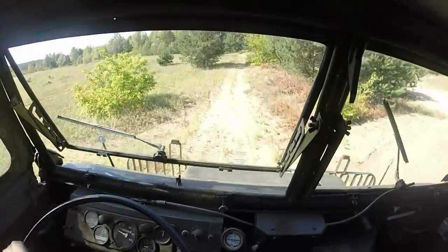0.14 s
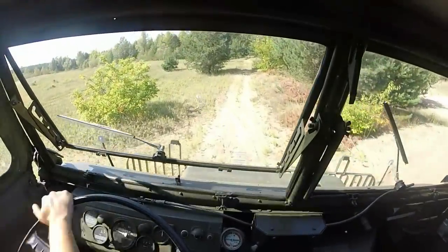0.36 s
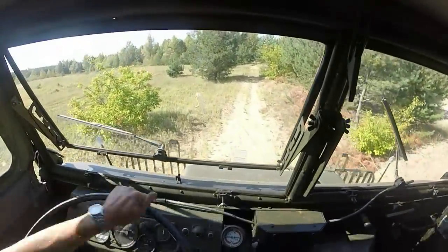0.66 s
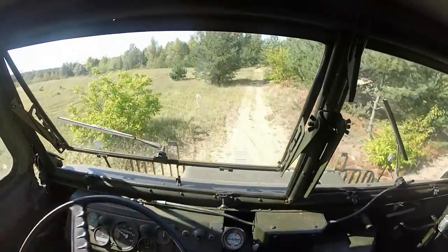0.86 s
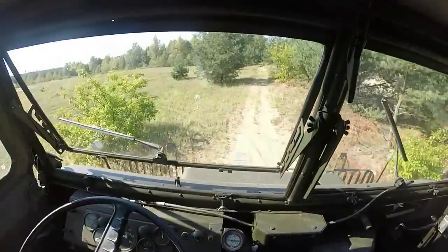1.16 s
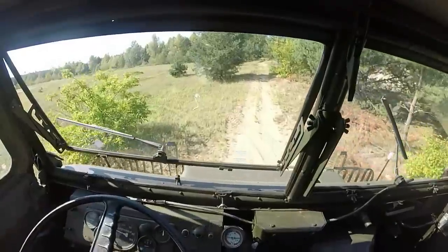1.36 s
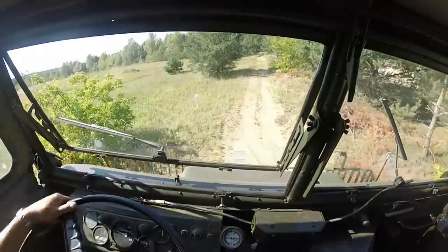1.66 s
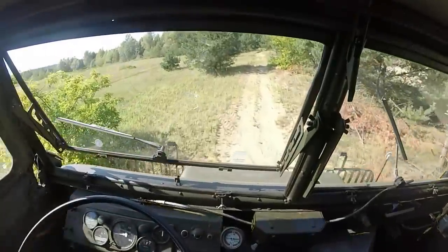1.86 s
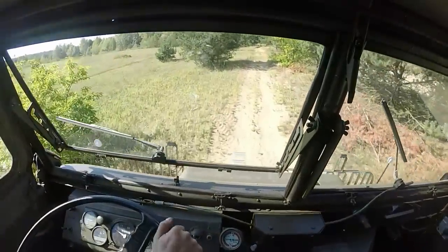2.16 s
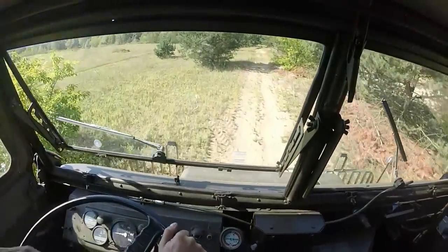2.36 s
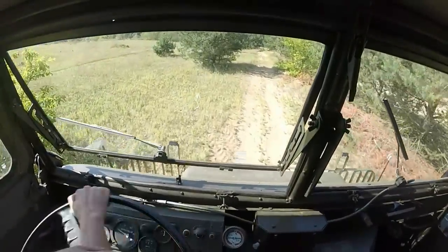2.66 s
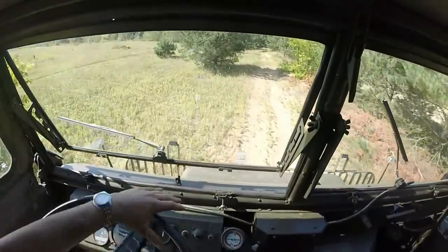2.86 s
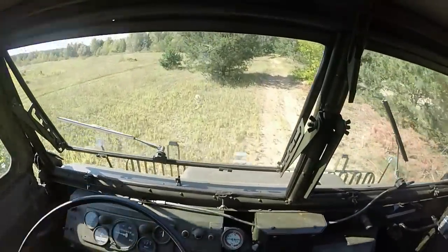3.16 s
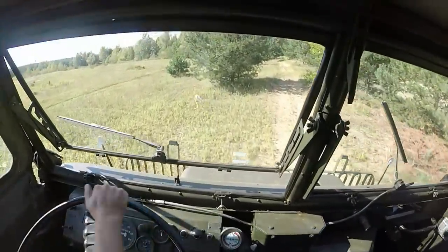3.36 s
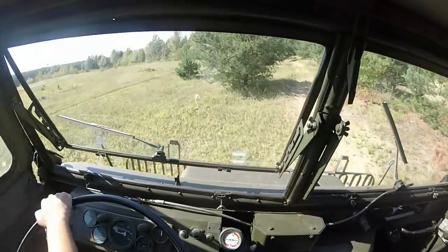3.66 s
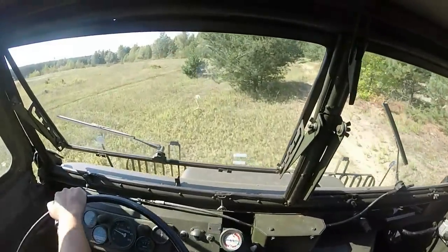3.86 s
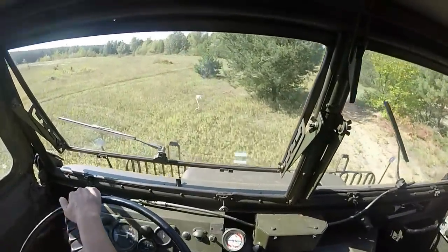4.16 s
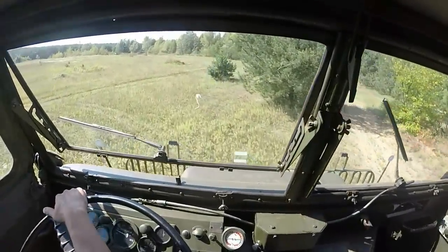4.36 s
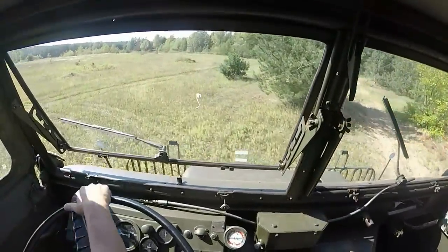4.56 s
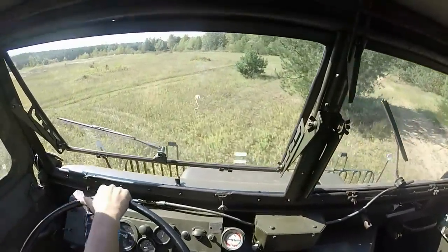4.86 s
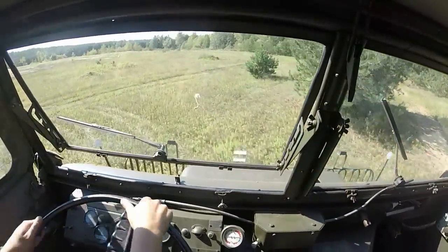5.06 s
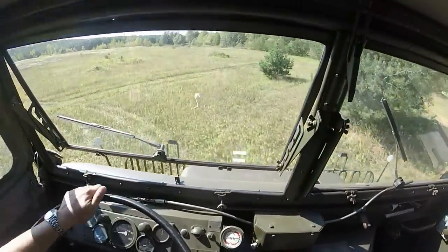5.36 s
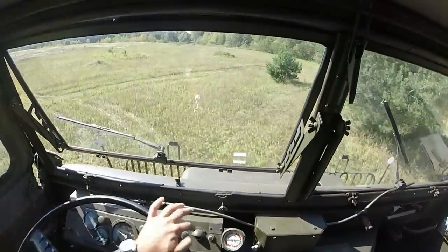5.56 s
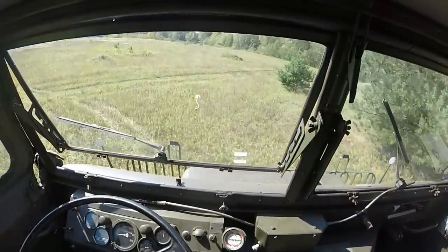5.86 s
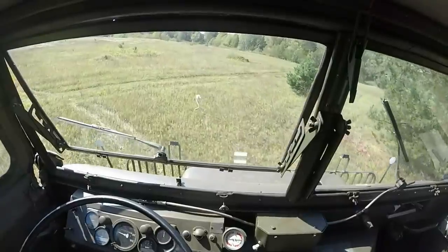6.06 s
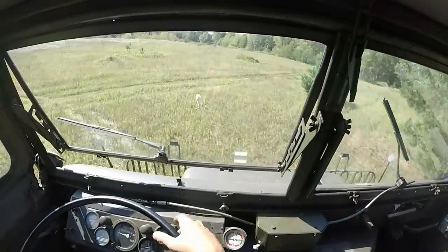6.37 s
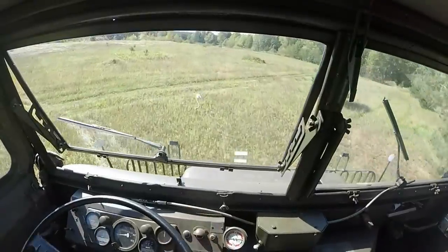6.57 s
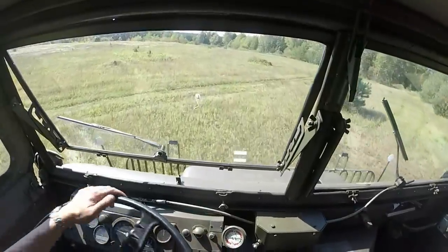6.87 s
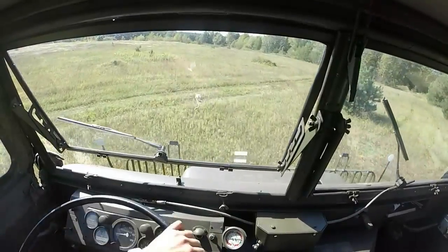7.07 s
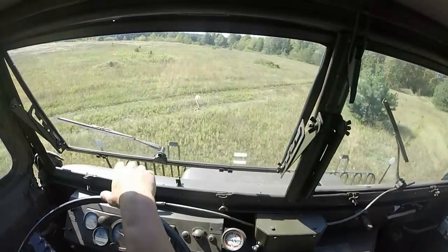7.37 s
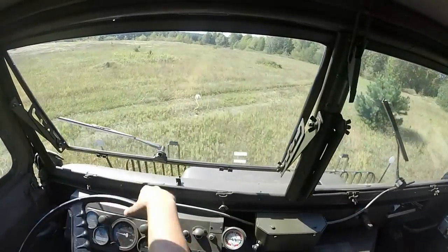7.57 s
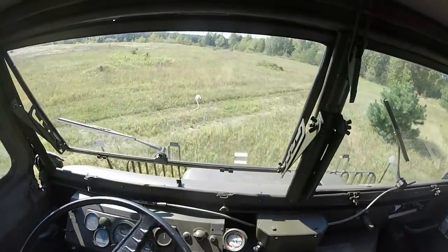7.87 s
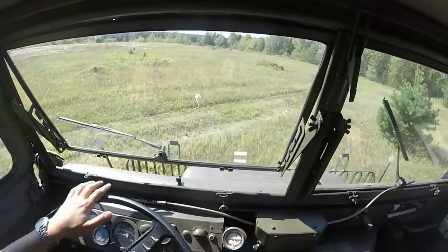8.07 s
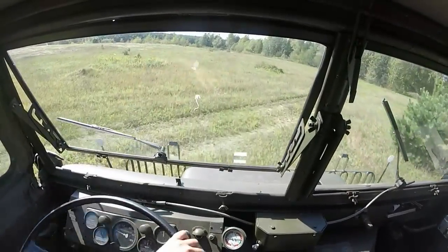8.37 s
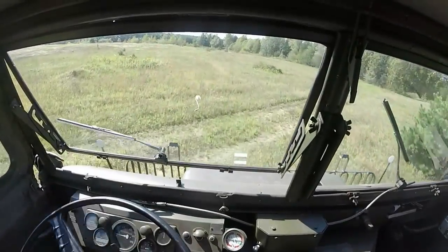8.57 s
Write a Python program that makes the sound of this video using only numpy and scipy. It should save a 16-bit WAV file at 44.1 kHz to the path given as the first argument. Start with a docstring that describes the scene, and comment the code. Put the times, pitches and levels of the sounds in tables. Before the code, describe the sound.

Heavy truck interior on rough ground: deep wavering engine hum, muffled roar, frequent dull thuds, clattering knocks, light taps and a few dry scrapes.

```python
"""Old truck cab on rough ground

Inside a steel cab, heard by a small camera in a hard case. A slow six-beat engine hums as a stack of
wavering tones, and its noisy roar is coloured by the cab panels and the case. Bumps ring the camera mount
near 155 Hz, loose fittings knock and tap, a small metal part tinks, and something dry scrapes.
The background drops suddenly at set times, as after loud jolts, and then creeps back up."""
import sys
import numpy as np
from scipy import signal
from scipy.fft import rfft, irfft
from scipy.io import wavfile
from scipy.ndimage import uniform_filter1d

SR = 44100
rng = np.random.default_rng(int(sys.argv[2]) if len(sys.argv) > 2 else 0)


def dump_mix(stems):
    """Bounce the given channels to the path in sys.argv[1] as a 16-bit WAV at rate SR."""
    frames = np.atleast_2d(stems).T  # one column per channel
    limited = np.clip(frames, -1, 1)  # hard clip at full scale
    pcm = np.round(limited * 32767).astype(np.int16)
    wavfile.write(sys.argv[1], SR, pcm)


def how_loud(loudness_db):
    """Turn decibels into a plain amplitude multiplier (0 dB gives 1, 20 dB gives 10)."""
    steps = np.asarray(loudness_db, float) / 20
    return 10 ** steps


N = 384552
T = np.arange(N) / SR  # time of every sample, s

# how fast the background creeps back after a drop, and how long the drop is smoothed over
# drops of the background: t/s, level just after the drop compared with full/dB
CREEP_DB_PER_S, SINK_S = 12, 0.018
DROPS = [(0, -5.5), (.66, -7), (.845, -10), (1.04, -15), (2.115, -8.5), (2.23, -10), (2.44, -10.5),
         (2.8, -9.5), (2.94, -12.5), (3.39, -10), (3.57, -11.5), (3.77, -12.5), (4.25, -13.5), (4.52, -14),
         (4.575, -18.5), (5.355, -13), (5.43, -14), (5.63, -15.5), (6.9, -4.5), (8.27, -2)]

# engine over time: t/s, cycle rate f/Hz, hum level over road rumble/dB,
# level of both together before heaving and drops/dB
ENGINE_SPEED = [(0, 15.6, -1, -13), (.45, 16.1, 0, -16), (.8, 16.6, 0.5, -12.5), (1.5, 13.8, 9, -18),
                (2.4, 14.2, 3, -12), (3.1, 15.4, 8.5, -11), (3.6, 15.1, -6, -11), (4.2, 15.3, 6.5, -10.5),
                (4.7, 14.7, 2, -14), (5.2, 14, 3, -8), (5.9, 13.1, 6, -15), (6.3, 13.3, 3, -14),
                (6.8, 14.4, 5, -12), (7.2, 15.2, 7, -17), (7.7, 16.8, 8.5, -15.5), (8.2, 15.3, 3, -15),
                (8.72, 15.8, 14, -12)]
# engine hum tones: multiple of the cycle rate, level/dB
ENGINE_TONES = [(1, 7), (2, -2), (3, -11.5), (4, -7.5), (5, -2.5), (6, -2), (7, -20), (9, -7), (12, -10),
                (15, -23.5)]
# cab body resonances shaken by the road: f/Hz, width/Hz, level/dB
CAB_BODY = [(16.6, 2.5, -3), (30.8, 2.9, -7.5), (55.87, 5.1, -0.5), (86.2, 8.6, -8), (121, 28, -19.5)]
SWAY_DB, SWAY_PER_S = 1.6, 6  # rumble and mount hum heave with the ruts: spread, new levels a second

# broad colour of the roar before its resonances: f/Hz, level per Hz/dB
ROAR_COLOUR = [(120, -23), (220, -5.5), (390, -14), (530, -34), (700, -21.5), (1200, -25), (1530, -28),
               (1850, -28.5), (2150, -32), (3300, -29.5), (3900, -35), (6300, -39), (9500, -51.5),
               (13000, -61.5), (15500, -82)]
# cab panels that drone with the engine: f/Hz, width/Hz, lift of the roar/dB
CAB_PANELS = [(219.5, 14, 5.5), (324, 22, 8.5), (340, 7.7, 3), (446, 20, 14.5), (483, 18, 6.5)]
# case resonances in four groups from low to high: f/Hz, time to fade by 60 dB t/s,
# level when knocked/dB, lift of the roar/dB
CASE_GROUPS = [
    [(320, 0.062, 6.5, -1.5), (440.5, 0.08, -2, 6.5), (612, 0.051, 0, 11.5), (812, 0.041, -3, -5.5)],
    [(1025, 0.035, 0.5, 3), (1229, 0.029, 9, 6), (1404, 0.041, -4.5, 2.5)],
    [(1730, 0.03, -0.5, 5), (1872, 0.042, 5.5, 5), (1948, 0.079, -10.5, 8.5)],
    [(2375, 0.065, -8, 13.5), (2659, 0.041, 5.5, 8), (2752, 0.015, 6, 2), (3440, 0.031, -14.5, 9),
     (4220, 0.04, -21, 0.5), (4770, 0.023, -16.5, -5), (4870, 0.039, -18, 3.5), (5750, .02, -18.5, 4),
     (7800, 0.0097, -36, 4)],
]
ROAR_FULL_DB = -55  # level of the roar from 6.5 to 10 kHz, at full background
RATTLE_PER_S, RATTLE_DB = 90, -7.5  # loose grit: average ticks a second, gain before mixing with the hiss

# random light taps: usual rate, rise of that rate after a knock (8 = nine times), fading time of the rise
TAPS_PER_S, TAPS_AFTER, TAPS_AFTER_S = 14, 8.0, 0.06
TAPS_SPREAD_DB, TAP_S = 4, 0.005  # size spread, fading time of one push
# taps in each of the four case groups, at full background: level/dB
TAP_LEVELS = [-43, -48, -47, -53]

# resonances of the small metal part: f/Hz, time to fade by 60 dB t/s, level/dB
METAL_PART = [(8620, .1, 0), (11500, .08, -17), (5700, .03, -4)]
# tinks of that part: t/s, peak level/dB
TINK_HITS = [(1.6742, -56), (4.3344, -54), (4.8564, -64), (5.123, -69), (5.7823, -66), (5.87, -64),
             (5.9402, -66)]
# bright scrapes, like a hand or sleeve against something dry: t/s, peak level/dB
SCRAPE_HITS = [(0.437, -38.5), (1.115, -39), (2.946, -52), (3.3784, -47), (3.7828, -43.5), (4.0702, -47),
               (5.3677, -50)]

# knocks on the case: t/s, then peak level/dB of the first, second, third and fourth case group
KNOCK_HITS = [(.2592, -30, -35, -39, -42), (.2958, -31, -32, -36, -41), (.4356, -32, -36, -41, -32),
              (.4811, -27.5, -31, -33, -32), (.529, -17, -20, -20, -19), (.582, -29, -22, -27, -35),
              (.6216, -26, -27, -34, -44), (.6559, -25, -16, -16, -20), (.6886, -27, -29, -22, -18),
              (.781, -13, -20, -24, -30), (.841, -21, -23, -16, -16), (.943, -29, -31, -33, -32),
              (.9876, -24, -28, -25, -30), (1.0065, -29, -29, -19, -32), (1.017, -22, -35, -31, -34),
              (1.0386, -25, -29, -26, -31), (1.239, -30, -43, -51, -51), (1.276, -31, -42, -44, -58),
              (1.298, -38, -39, -40, -42), (1.372, -27, -34, -37.5, -34), (1.449, -32, -36, -39, -41),
              (1.535, -25, -33, -38, -40), (1.683, -37, -45, -36, -44), (1.995, -32, -34.5, -44, -44),
              (2.075, -32, -29, -33, -47), (2.1084, -18, -22, -15, -18), (2.2295, -23, -34, -29, -37),
              (2.4315, -25, -17, -19, -33), (2.447, -27, -32, -38, -40), (2.551, -38, -33, -28, -44),
              (2.567, -34, -38, -37, -45), (2.66, -31.5, -37, -44, -35), (2.709, -47, -35, -42, -49),
              (2.7605, -28, -34, -35, -43), (2.839, -36, -38, -39, -38), (2.904, -49, -52, -35, -52),
              (2.935, -19, -36, -41, -44), (2.944, -28, -38, -36, -36), (3.0265, -20, -29, -35, -43),
              (3.141, -31, -38, -57, -52), (3.354, -33, -37, -31, -36), (3.3635, -29, -31, -40, -40),
              (3.38, -14, -31, -34, -31), (3.391, -25, -33, -28, -39), (3.559, -16, -19, -37, -28),
              (3.584, -16, -22, -21, -27), (3.629, -21, -32, -42, -38), (3.709, -36, -41, -33, -55),
              (3.747, -16, -18, -22, -28), (3.762, -18, -26, -28, -34), (3.783, -20, -25.5, -26, -30),
              (3.8615, -28, -45, -45, -39), (3.971, -35, -39, -36, -48), (4.035, -39, -42, -37, -58),
              (4.067, -28, -44, -38, -37), (4.13, -22, -23, -18, -19), (4.176, -28, -38, -38, -40),
              (4.218, -32, -28, -32, -36), (4.2406, -16, -20, -14, -16), (4.37, -45, -38, -36, -44),
              (4.47, -28, -33, -29, -38), (4.493, -32, -32, -26, -39), (4.52, -22, -25, -23, -33),
              (4.535, -30, -28, -27, -28), (4.566, -20, -26, -29, -29), (4.605, -34, -39, -37, -37),
              (4.703, -22, -29, -29, -31), (4.989, -30, -43, -40, -40), (5.033, -30, -34, -50, -40),
              (5.329, -18, -22, -26, -33), (5.349, -23, -21, -26, -29), (5.399, -36, -39, -33, -30),
              (5.426, -25, -41, -31, -35), (5.579, -25, -37, -37, -32), (5.621, -26, -37, -40, -42),
              (5.648, -22, -43, -40, -46), (5.672, -22, -31, -43, -42), (5.806, -38, -42, -39, -38),
              (5.922, -33, -41, -33, -49), (6.274, -42, -44, -33, -43), (6.285, -36, -37, -38, -34),
              (6.338, -38, -44, -33, -40), (6.378, -26, -27, -37, -31), (6.661, -33, -31, -30, -39),
              (6.68, -34, -39, -31, -46), (6.719, -20, -28, -25, -35), (6.861, -28, -41, -31, -39),
              (6.9815, -26, -51, -40, -37), (7.024, -23, -42, -36, -28), (7.1, -31, -34, -32, -37),
              (7.139, -29, -31, -30, -53), (7.283, -30, -46, -29, -53), (7.305, -27, -38, -36, -50),
              (7.503, -30, -35, -37, -53), (7.521, -27, -42, -33, -40), (7.587, -26, -29, -33, -32),
              (7.712, -25, -28, -28, -31), (7.987, -40, -50, -28, -45), (8.205, -27, -41, -36, -47),
              (8.371, -35, -41, -33, -39), (8.52, -24, -46, -37, -39), (8.5824, -24, -23, -17, -17)]
CONTACT_S = 0.0032  # length of the first contact
CHATTER_T60_S, CHATTER_S_PER_DB = 0.06, 0.002  # fade time at -20 dB; fainter knocks chatter on longer

# camera mount resonances: f/Hz, time to fade by 60 dB t/s, level/dB
MOUNT_MODES = [(138, 0.13, -7), (154.8, 0.21, 2), (189, 0.061, -9.5), (220.4, 0.13, -19),
               (318.3, 0.07, -18), (320, 0.054, -40), (406.7, 0.36, -32.5)]
# bumps that ring the mount: t/s, peak level/dB, pitch f/Hz
BUMP_HITS = [(0.073, -12, 151), (0.371, -13.5, 153.6), (0.538, -12.5, 145), (0.597, -15, 151),
             (0.696, -10, 152), (0.775, -9.5, 158.6), (0.926, -14, 147), (0.992, -9, 164),
             (1.025, -8.5, 162.4), (1.074, -6.5, 155.6), (1.14, -15, 158), (1.73, -16, 155),
             (1.79, -17, 160), (1.93, -17, 170), (2.071, -11.5, 145.4), (2.127, -8.5, 150),
             (2.19, -14, 163), (2.212, -10, 163), (2.245, -9, 163), (2.275, -13, 163), (2.433, -7.5, 164.6),
             (2.656, -16, 159.3), (2.794, -5.5, 165), (2.937, -6.5, 155.7), (3.384, -7.5, 146.3),
             (3.566, -16, 140), (3.752, -11, 163), (3.789, -9.5, 152.7), (3.969, -14.5, 148.9),
             (4.25, -9.5, 153.5), (4.504, -7.5, 162), (4.571, -7.5, 148.4), (4.708, -8.5, 160.7),
             (5.352, -5, 156.1), (5.43, -14, 155), (5.58, -6.5, 163), (5.625, -6, 157.6), (5.68, -12, 161),
             (6.406, -14, 155), (6.593, -14, 155.7), (6.658, -15, 156.3), (6.744, -12.5, 164),
             (6.788, -11.5, 155), (6.84, -13, 155), (6.891, -8, 156.4), (7.066, -16, 152.8),
             (7.157, -14.5, 154), (7.314, -7.5, 155), (7.396, -15, 152.5), (7.658, -14.5, 148.4),
             (7.751, -16.5, 137.2), (7.829, -10, 158), (8.018, -15, 146.4), (8.264, -8.5, 151),
             (8.338, -16, 147.7), (8.427, -8, 147.7), (8.516, -12.5, 151), (8.587, -14, 145),
             (8.639, -11, 158)]
BUMP_T60_S, PUSH_S = 0.115, 0.0065  # fade of the bump's main tone by 60 dB, fading time of the push
SHAKE_FULL_DB, SHAKE_FOLLOWS = -20, 0.33  # mount hum at full background, its share of each drop in dB


def unit(x):
    """Scale a sound to an average (rms) level of 1."""
    return x / np.sqrt(np.mean(x ** 2))


def walk(rate):
    """Wander at random: pick `rate` levels a second, smooth them twice, give them a spread of 1."""
    hold = int(SR / rate)
    steps = np.repeat(rng.standard_normal(N // hold + 1), hold)
    smooth = uniform_filter1d(uniform_filter1d(steps, hold), hold)
    return unit(smooth[:N])


def ring(hz, t60, db, seconds=0.25):
    """Let a set of resonances ring freely after one tap, each fading at its own speed."""
    t = np.arange(int(seconds * SR))[:, None] / SR
    fade = np.exp(-np.log(1000) * t / t60)
    return np.sum(how_loud(db) * np.sin(2 * np.pi * hz * t) * fade, axis=1)


def add(out, s, x, peak_db):
    """Mix a hit in at time s; its loudest 6 ms get the given average (rms) level."""
    i = int(s * SR)
    loudest = np.sqrt(uniform_filter1d(x ** 2, size=280).max())
    out[i:i + len(x)] += (x * how_loud(peak_db) / loudest)[:len(out) - i]


def coloured(x, gain):
    """Filter a sound by a gain that depends on frequency."""
    f = np.maximum(np.arange(N // 2 + 1) * SR / N, 1)
    return irfft(rfft(x) * gain(f), N)


def peak(f, hz, width):
    """Strength of one resonance around its centre, where it is 1."""
    return 1 / np.sqrt(1 + ((f - hz * hz / f) / width) ** 2)


def sink():
    """Background level in dB: it drops at once, then climbs at a steady pace until full."""
    s, db = np.transpose(DROPS)
    last = np.maximum(np.searchsorted(s, T, side="right") - 1, 0)
    climbing = db[last] + CREEP_DB_PER_S * (T - s[last])
    return uniform_filter1d(np.minimum(climbing, 0), int(SINK_S * SR))


def body_gain(f):
    """The cab body's resonances, added together as powers."""
    return np.sqrt(sum((how_loud(db) * peak(f, hz, width) ** 2) ** 2 for hz, width, db in CAB_BODY))


def rumble(cycles, hum_db):
    """Engine tones that waver with uneven firing, over the road shaking the cab body."""
    hum = 0
    for multiple, db in ENGINE_TONES:
        level = how_loud(db + 2.0 * walk(4))
        hum = hum + level * np.sin(2 * np.pi * (multiple * cycles + 0.042 * walk(2.6)))
    road = coloured(rng.standard_normal(N), body_gain)
    return (how_loud(hum_db) * unit(hum) + unit(road)) / np.sqrt(1 + how_loud(hum_db) ** 2)


def case_gain(f):
    """The roar's broad colour, lifted at each resonance of the cab panels and of the case."""
    hz_points, db_points = np.transpose(ROAR_COLOUR)
    broad = how_loud(np.interp(np.log(f), np.log(hz_points), db_points))
    lift = 0
    for group in CASE_GROUPS:
        for hz, t60, _, db in group:
            lift = lift + (how_loud(db) - 1) * peak(f, hz, 5.2 / t60) ** 2  # quick fading means a wide peak
    for hz, width, db in CAB_PANELS:
        lift = lift + (how_loud(db) - 1) * peak(f, hz, width) ** 2
    return broad * np.maximum(1 + lift, 0.1)


def roar(cycles):
    """Engine noise puffed by each of six firings a cycle, with loose grit ticking in it."""
    puff = 1 + 0.081 * np.cos(2 * np.pi * 6 * cycles)
    hiss = rng.standard_normal(N) * puff * how_loud(1.0 * walk(12))
    sizes = how_loud(np.minimum(5.1 * rng.exponential(size=N), 14))
    grit = (rng.random(N) < RATTLE_PER_S / SR) * sizes
    grit = np.convolve(grit, np.exp(-np.arange(600) / 126.0))[:N]
    # grit is duller than the hiss
    ticks = coloured(rng.standard_normal(N) * grit, lambda f: 1 / np.sqrt(1 + (f / 3300) ** 4))
    x = coloured(hiss + how_loud(RATTLE_DB) * ticks, case_gain)
    treble = coloured(x, lambda f: (f > 6500) & (f < 10000))
    return x / np.std(treble)


def taps():
    """Loose fittings push the case lightly at random, more often just after a knock."""
    stirred = sum((T > row[0]) * np.exp(-np.abs(T - row[0]) / TAPS_AFTER_S) for row in KNOCK_HITS)
    hits = rng.random(N) < TAPS_PER_S * (1 + TAPS_AFTER * stirred) / SR
    size_db = TAPS_SPREAD_DB * rng.exponential(size=N).clip(0, 3)
    fade = np.exp(-np.arange(2000) / SR / TAP_S)
    out = 0
    for group, level_db in zip(CASE_GROUPS, TAP_LEVELS):
        hz, t60, db, _ = np.transpose(group)
        sizes = how_loud(size_db + 3.7 * rng.standard_normal(N))
        push = signal.fftconvolve(hits * sizes, fade)[:N] * rng.standard_normal(N)
        tone = signal.fftconvolve(push, ring(hz, t60, db, seconds=0.05))[:N]
        out = out + how_loud(level_db) * unit(tone)
    return out


def scrapes():
    """Short hissy scrapes: fading noise kept between 3.5 and 6.5 kHz."""
    out = np.zeros(N)
    t = np.arange(int(0.04 * SR)) / SR
    band = signal.butter(N=3, Wn=[3500, 6500], btype="band", fs=SR, output="sos")
    for s, peak_db in SCRAPE_HITS:
        noise = rng.standard_normal(len(t)) * np.exp(-t / 0.0076)
        add(out, s, signal.sosfilt(band, noise), peak_db)
    return out


def tinks():
    """Thin high rings of a small loose metal part, each set off by 12 ms of noise."""
    out = np.zeros(N)
    tone = ring(*np.transpose(METAL_PART), seconds=0.1)
    for s, peak_db in TINK_HITS:
        touch = rng.standard_normal(int(0.012 * SR))
        add(out, s, np.convolve(touch, tone), peak_db)
    return out


def knocks():
    """Each knock is a contact and a rough chatter that ring the case, a little differently every time."""
    out = np.zeros(N)
    t = np.arange(int(0.08 * SR)) / SR
    contact = np.exp(-(t / CONTACT_S) ** 2)
    for s, *group_db in KNOCK_HITS:
        chatter_t60 = CHATTER_T60_S + CHATTER_S_PER_DB * (-20 - max(group_db[1:]))
        # the part rebounds every few ms
        bounces = how_loud(3 * np.repeat(rng.standard_normal(len(t) // 100 + 1), 100)[:len(t)])
        chatter = 0.61 * bounces * np.exp(-np.log(1000) * t / max(chatter_t60, 0.01))
        rub = rng.standard_normal(len(t)) * np.minimum(t / 0.002, 1) * (contact + chatter)
        for group, peak_db in zip(CASE_GROUPS, group_db):
            hz, t60, db, _ = np.transpose(group)
            chance = rng.standard_normal((2, len(hz)))
            tone = ring(hz * (1 + 0.02 * chance[0]), t60, db + 2.5 * chance[1], seconds=0.05)
            # the ringing swells over about a cycle, so there is no bright click
            tone = tone * (1 - np.exp(-(t[:len(tone)] * hz[0] / 0.9) ** 2))
            add(out, s, signal.fftconvolve(rub, tone), peak_db)
    return out


def mount(shake_db):
    """Small uneven jolts keep the mount humming; each big bump rings it afresh at its own pitch."""
    hz, t60, db = np.transpose(MOUNT_MODES)
    jolts = rng.standard_normal(N) * how_loud(2.83 * walk(25))
    out = how_loud(shake_db) * unit(signal.fftconvolve(jolts, ring(hz, t60, db))[:N])
    t = np.arange(int(0.12 * SR)) / SR
    for s, peak_db, pitch_hz in BUMP_HITS:
        push = -np.sin(2 * np.pi * pitch_hz * t) * np.exp(-t / PUSH_S)
        scatter_db = 3 * rng.standard_normal(len(hz) - 2)
        # the bump's own pitch stands in for the two lowest resonances
        bump_hz, bump_t60 = np.r_[pitch_hz, hz[2:]], np.r_[BUMP_T60_S, t60[2:]]
        tone = ring(bump_hz, bump_t60, db[1:] + np.r_[0, scatter_db])
        add(out, s, signal.fftconvolve(push, tone), peak_db)
    return out


def scene():
    """All sources at the single microphone."""
    s, *columns = np.transpose(ENGINE_SPEED)
    cycle_hz, hum_db, rumble_db = (np.interp(T, s, column) for column in columns)
    cycles = np.cumsum(cycle_hz) / SR
    under_db = sink()
    low = how_loud(rumble_db + SWAY_DB * walk(SWAY_PER_S)) * rumble(cycles, hum_db)
    background = how_loud(under_db) * (low + how_loud(ROAR_FULL_DB) * roar(cycles))
    background = background + how_loud(0.5 * under_db) * taps()  # taps drop by half as many dB
    shake_db = SHAKE_FULL_DB + SHAKE_FOLLOWS * under_db + SWAY_DB * walk(SWAY_PER_S)
    mix = background + scrapes() + tinks() + knocks() + mount(shake_db)
    return mix[None]


def band_limit(x):
    """A steep low-pass at the top of the band."""
    return signal.sosfilt(signal.butter(12, 15300, fs=SR, output="sos"), x)


def record(dry):
    """The input stage clips the very loudest peaks, a little sooner on the negative side."""
    mix = np.clip(dry, -0.93, 0.98)
    return band_limit(mix)


dry = scene()
out = record(dry)
dump_mix(out)
```